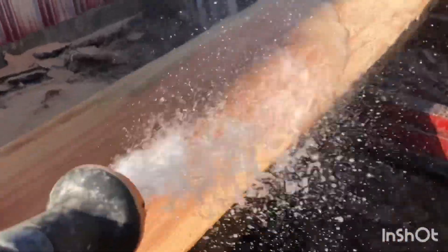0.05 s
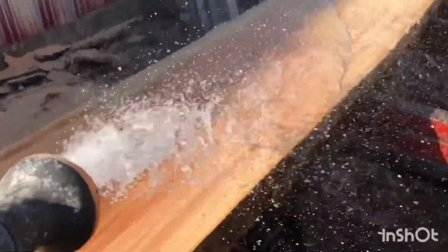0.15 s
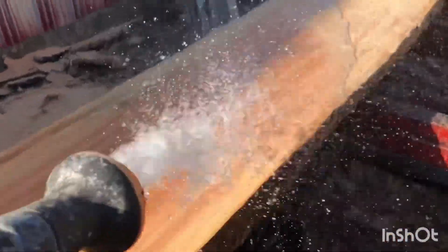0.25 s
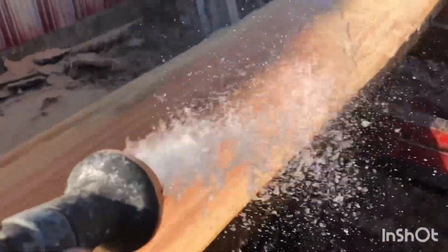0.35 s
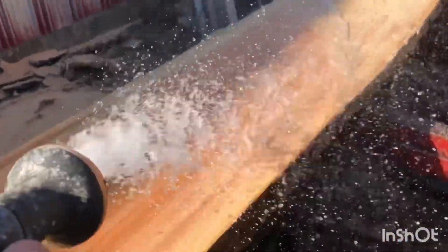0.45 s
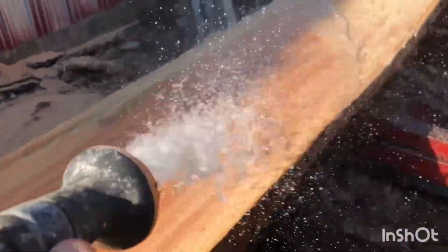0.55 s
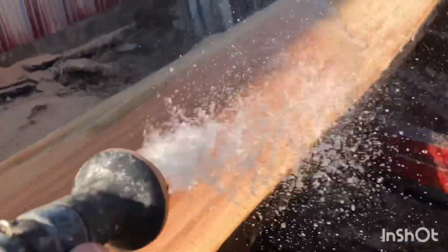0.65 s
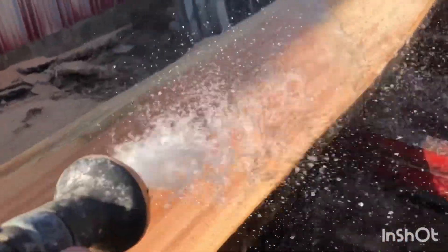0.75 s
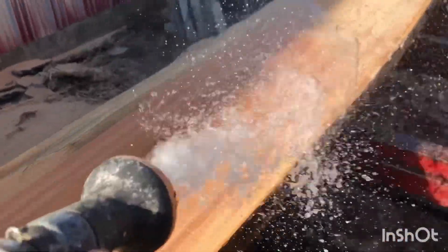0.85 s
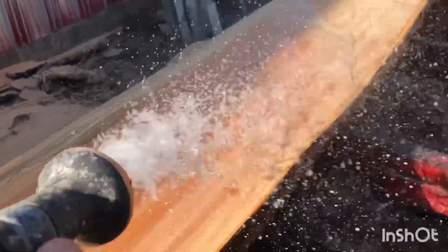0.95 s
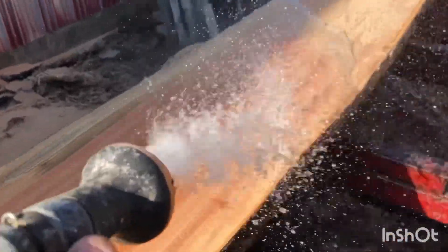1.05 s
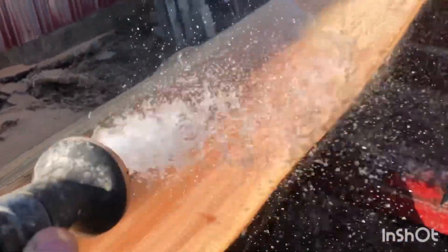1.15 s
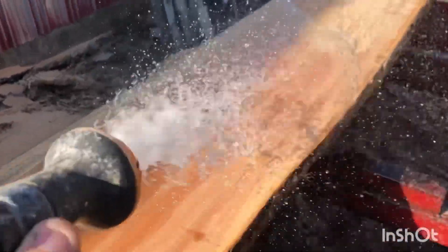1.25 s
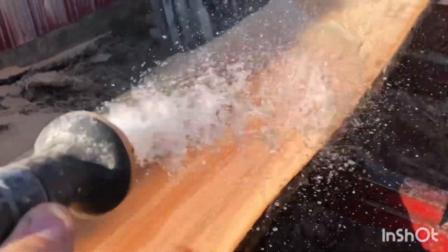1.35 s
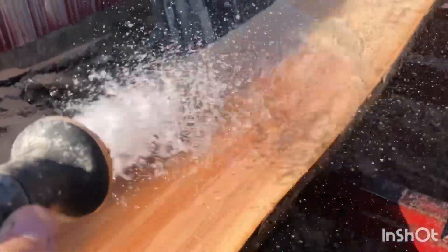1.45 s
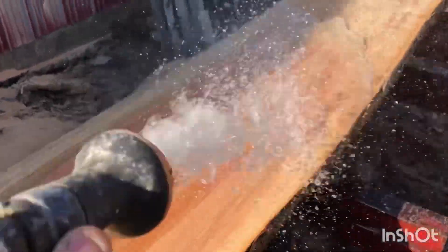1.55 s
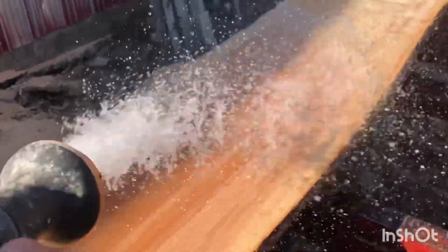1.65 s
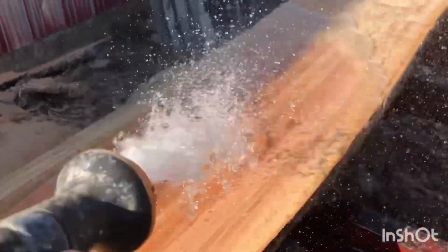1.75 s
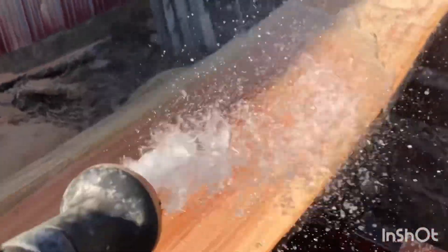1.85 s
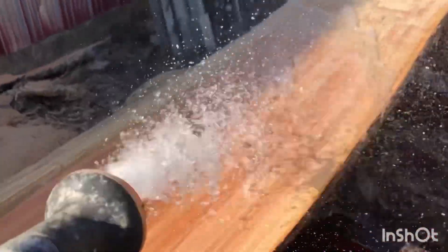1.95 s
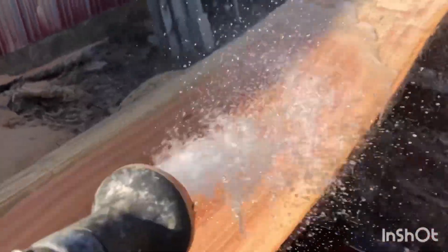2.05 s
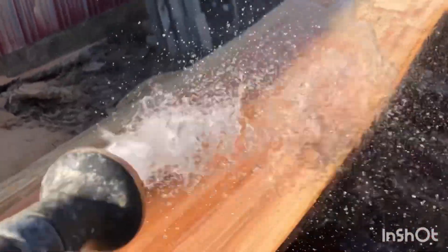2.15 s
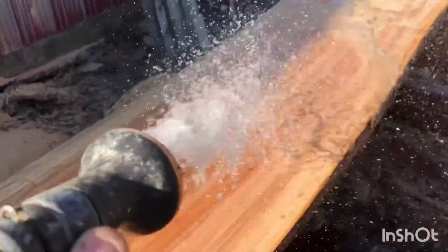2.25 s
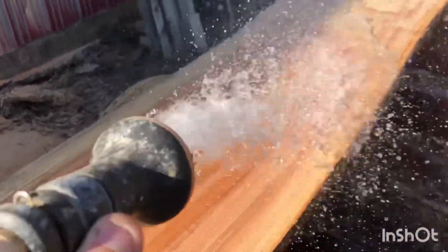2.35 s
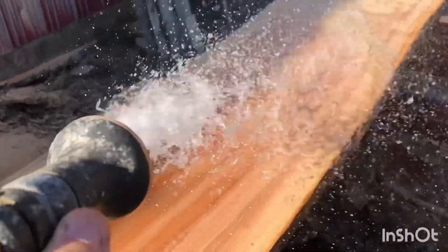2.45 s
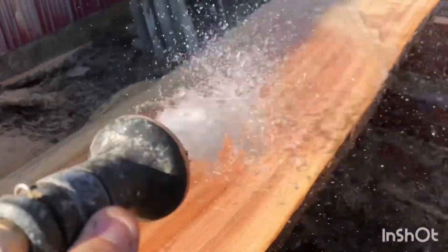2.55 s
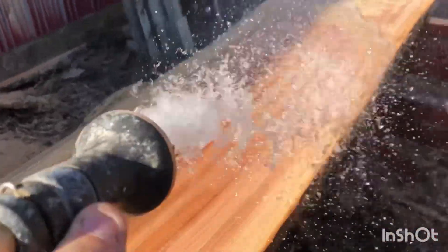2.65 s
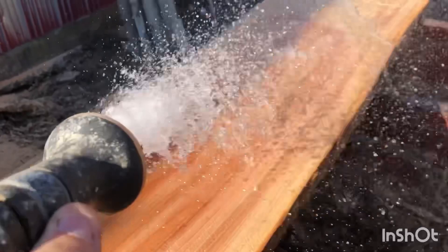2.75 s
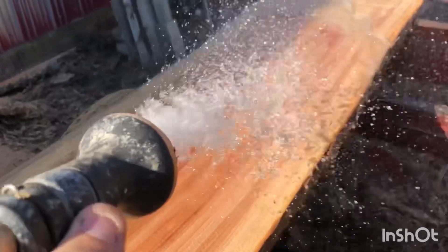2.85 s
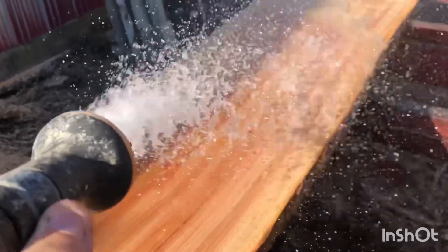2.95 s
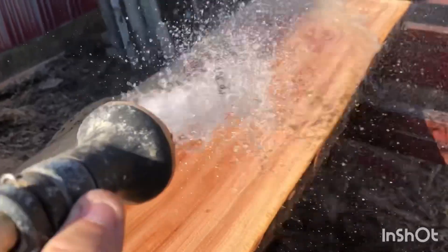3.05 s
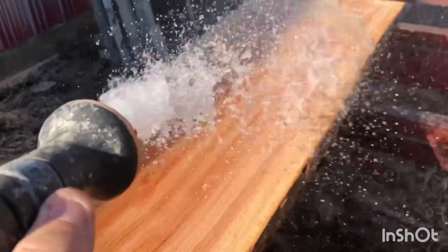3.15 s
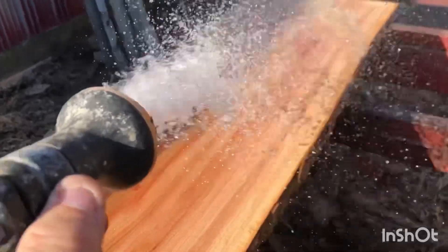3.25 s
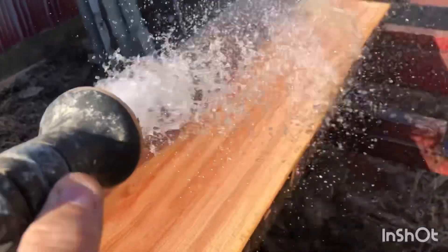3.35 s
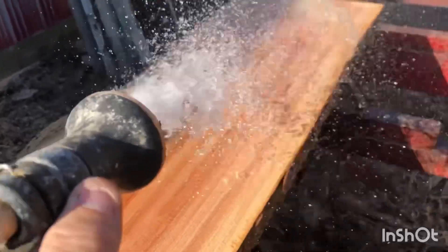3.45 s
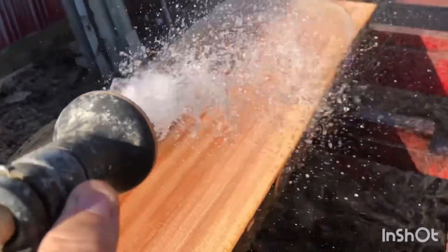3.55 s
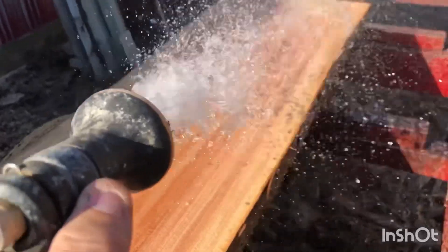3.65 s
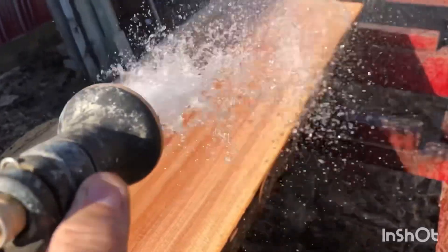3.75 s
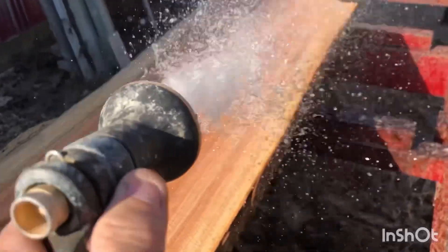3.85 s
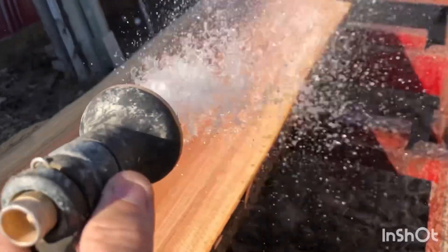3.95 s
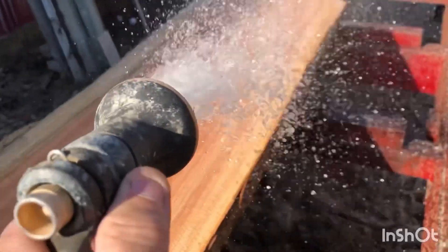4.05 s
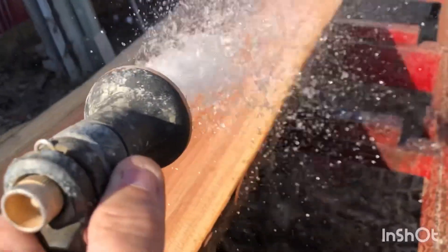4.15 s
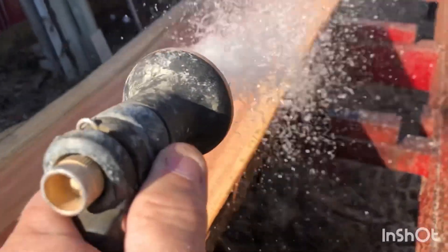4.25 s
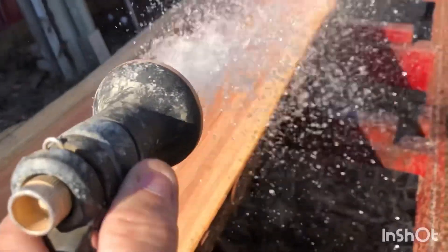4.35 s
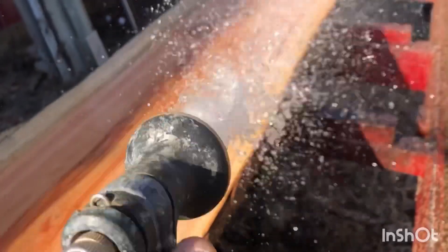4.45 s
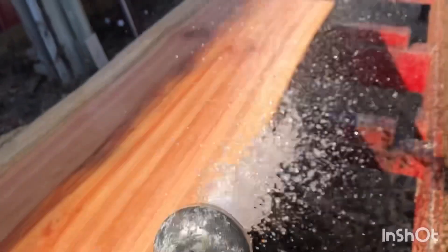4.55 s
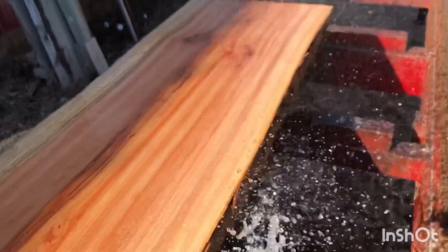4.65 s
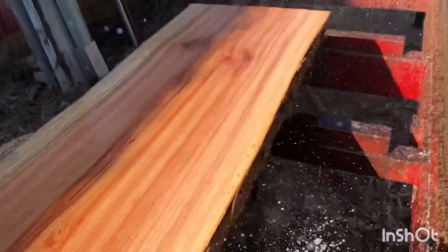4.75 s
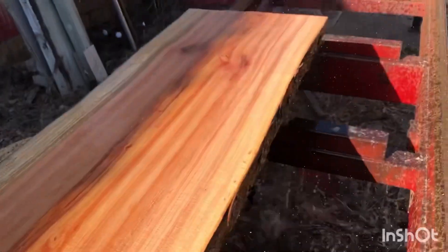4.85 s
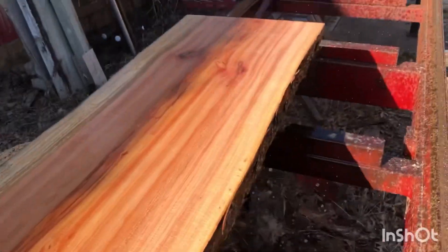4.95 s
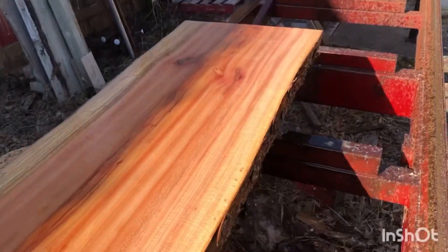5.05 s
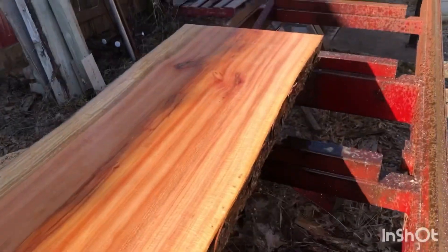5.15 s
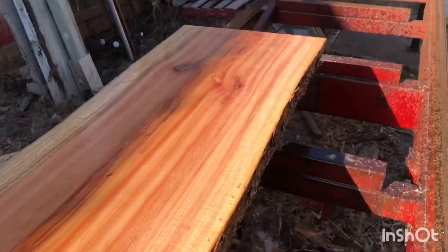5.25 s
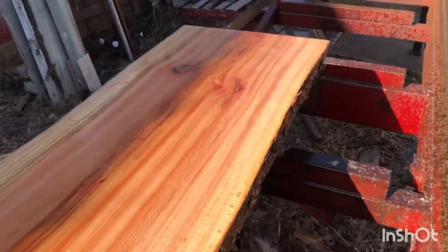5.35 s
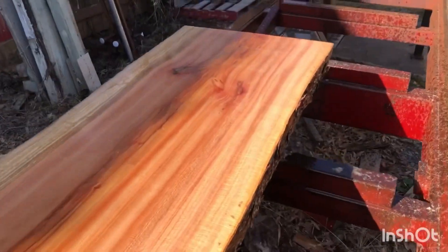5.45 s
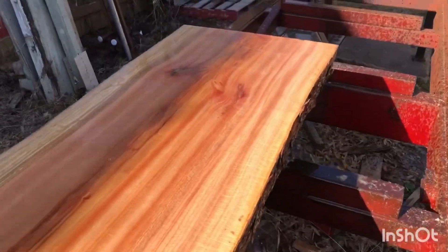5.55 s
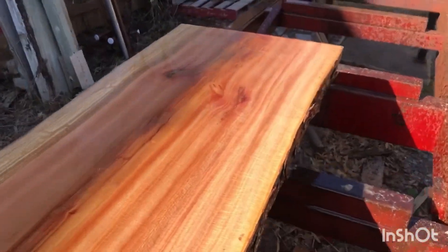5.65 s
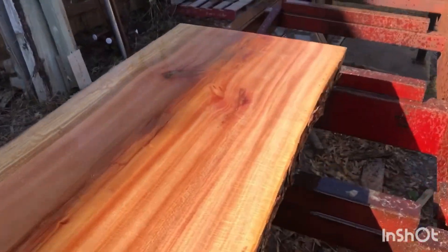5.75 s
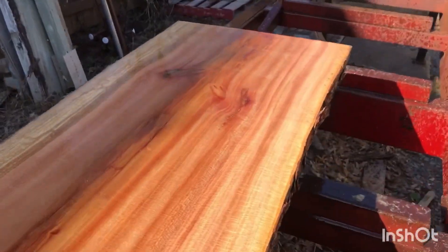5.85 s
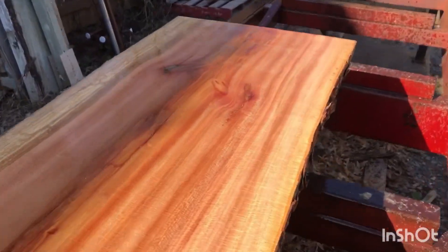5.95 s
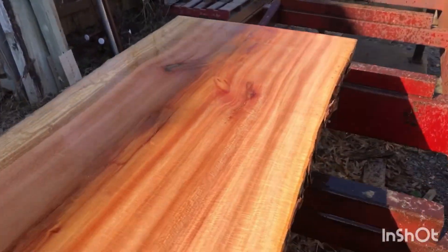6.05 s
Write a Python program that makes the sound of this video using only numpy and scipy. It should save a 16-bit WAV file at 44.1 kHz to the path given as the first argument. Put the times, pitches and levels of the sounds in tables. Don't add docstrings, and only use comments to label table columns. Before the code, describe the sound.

Strong, close water spray over wood with a few thumps, cut off in a glugging burst, then fine drips over distant machine rumble.

```python
import sys
import numpy as np
from scipy import signal
from scipy.fft import rfft, irfft, next_fast_len
from scipy.io import wavfile
from scipy.ndimage import uniform_filter1d, map_coordinates

SR = 44100
rng = np.random.default_rng(int(sys.argv[2]) if len(sys.argv) > 2 else 0)


def log_audio(samples):
    frames = np.atleast_2d(samples).T
    limited = np.clip(frames, -1, 1)
    pcm = np.round(limited * 32767).astype(np.int16)
    wavfile.write(sys.argv[1], SR, pcm)


def natural_amplitude(level_db):
    exponent = np.asarray(level_db, float) / 20
    return 10 ** exponent


N = 268569
TIME_S = np.arange(N) / SR
CLOSE_S = 4.79


def unit(x):
    return x / np.sqrt(np.mean(x ** 2) + 1e-20)


def curves(rows):
    s, *cols = np.transpose(rows)
    return [np.interp(TIME_S, s, c) for c in cols]


def ramp(from_s, to_s):
    return np.clip((TIME_S - from_s) / (to_s - from_s), 0, 1)


def wobble(rate):
    points = rng.standard_normal(int(N * 400 / SR) + 4)
    return map_coordinates(points, [TIME_S * min(rate, 399)])


def filtered(x, response):
    size = next_fast_len(N + 8192)
    spectrum = rfft(x, size) * response(np.fft.rfftfreq(size, 1 / SR))
    return irfft(spectrum, size)[:N]


def shape(points):
    f, db = np.transpose(points)
    return lambda hz: natural_amplitude(np.interp(np.log(hz + 1), np.log(f), db))


def modes(rows):
    def response(f):
        total = 0
        for centre, width, db, lag in rows:
            peak = 1j * f * width / (centre * centre - f * f + 1j * f * width)
            total = total + natural_amplitude(db) * np.exp(2j * np.pi * lag) * peak
        return total
    return response


def patchy(depth_db):
    z = signal.stft(rng.standard_normal(N), nperseg=256)[2]
    field = uniform_filter1d(rng.standard_normal(z.shape), size=10, axis=0)
    field = uniform_filter1d(field, size=4, axis=1)
    return signal.istft(z * natural_amplitude(depth_db * unit(field)), nperseg=256)[1][:N]


def droplets(count, centre_hz, spread, cycles, uneven_db, size=160):
    u, g = rng.random((count, 2)), rng.standard_normal(count)
    hz = np.clip(centre_hz * np.exp(spread * g), 200, 17000)[:, None]
    t = np.arange(size) / SR
    strength = natural_amplitude(-uneven_db * np.log(1 - 0.995 * u[:, 1:]))
    ring = np.sin(2 * np.pi * hz * t) * np.exp(-t * hz / cycles) * strength
    at = (u[:, :1] * N).astype(int) + np.arange(size)
    return unit(np.bincount(at.ravel(), ring.ravel(), N + size)[:N])


def add(track, s, piece):
    part = track[round(s * SR):][:len(piece)]
    part += piece[:len(part)]


def shut():
    return 1 - ramp(4.84, 4.9)


def jet(surge):
    # (time [s], level [dB])
    jet_level = [
        (0.0, -23),
        (4.4, -23),
        (4.54, -25.5),
        (4.63, -24),
        (4.73, -31.5),
        (4.79, -31.5),
        (4.8, -37),
        (4.9, -32),
    ]
    # (frequency [Hz], level [dB])
    hiss_colour = [(1300, -51), (2200, -19.5), (2900, -13), (4100, -4), (6000, -3.5), (9000, -9.5),
                   (12000, -5.5), (15000, -3), (15850, -7)]
    # (frequency [Hz], width [Hz], level [dB], lag [turns])
    nozzle = [(3776, 292, 3.7, -.2), (4512, 405, -8, -.13), (6255, 200, -15, 0), (8080, 1520, -1.2, .1),
              (9415, 484, 1.1, 0), (11150, 440, -9.6, -.15)]
    # (frequency [Hz], width [Hz], level [dB], lag [turns])
    whistles = [(11400, 2600, -4, 0), (10700, 860, -7, 0.03)]
    # (start [s], end [s])
    turns = [
        (4.38, 4.48),
        (4.45, 4.82),
    ]
    # (start [s], full [s], share [1])
    valve = [
        (4.49, 4.58, 0.95),
        (4.66, 4.717, 2.2),
    ]

    bursts = droplets(count=40000, centre_hz=9540, spread=0.53, cycles=1.0, uneven_db=1.5, size=40)
    mist = patchy(depth_db=1.32) + 0.47 * bursts
    open_air = filtered(mist, shape(hiss_colour))

    shares = [1 - ramp(*span) for span in turns]
    whistling = 1 - ramp(CLOSE_S, CLOSE_S + 0.038)
    shares += [share * ramp(start, full) * whistling for start, full, share in valve]
    colours = [nozzle[:1], nozzle[1:]] + [[row] for row in whistles]
    hiss = open_air
    for share, rows in zip(shares, colours):
        hiss = hiss + share * filtered(open_air, modes(rows))

    level_db = curves(jet_level)[0] + 0.28 * surge + 0.18 * wobble(60)
    return natural_amplitude(level_db) * unit(hiss) * shut()


def splash(surge):
    # (frequency [Hz], width [Hz], level [dB], lag [turns])
    slab = [(236, 220, -10.5, 0.0047), (550, 225, -3, .5), (1010, 270, 2.5, 1), (1596, 430, -4, 0.57)]
    # (time [s], extra fizz [dB])
    slugs = [(.28, 2), (1.16, 2), (1.25, 3), (1.34, 5), (1.56, 2), (2.2, 6), (2.34, 4), (2.47, 9),
             (2.9, 4.5), (3.262, 5.5), (3.31, 5.5), (4.1, 4.5), (4.19, 3), (4.36, 7), (4.59, 8),
             (4.655, 4.5), (4.7, 9), (4.75, 7.5), (4.8, 7.5)]
    # (time [s], level [dB])
    gurgle = [
        (4.36, -67),
        (4.41, -38),
        (4.46, -52),
        (4.57, -42.5),
        (4.65, -62),
        (4.72, -34.5),
        (4.75, -60),
        (4.85, -57),
        (5.15, -66.5),
    ]
    leave_s = 4.42
    slug_s = 0.014

    drying_db = -190 * np.maximum(TIME_S - CLOSE_S, 0)
    slugs_db = sum(db * np.exp(-((TIME_S - s) / slug_s) ** 2) for s, db in slugs)
    fizz_db = -39 - 1.5 * ramp(leave_s, leave_s + 0.044) + slugs_db + drying_db
    fizz_db = fizz_db + 0.28 * wobble(14) + 1.8 * surge + 1.1 * wobble(35)
    drum_db = -42 - 4.5 * ramp(leave_s, leave_s + 0.058) + drying_db
    drum_db = drum_db + 1.1 * wobble(25.13) + 0.7 * surge

    fizz = droplets(count=16000, centre_hz=2522, spread=0.17, cycles=3.2, uneven_db=3.0, size=240)
    blows = patchy(depth_db=-1.5) * natural_amplitude(0.36 * wobble(70))
    drum = unit(filtered(blows, modes(slab)))
    wet = (natural_amplitude(fizz_db) * fizz + natural_amplitude(drum_db) * drum) * shut()

    def echo(f):
        return 1 - 0.49 * 1j * f * 350 / (1880 ** 2 - f * f + 1j * f * 350)

    bubbles = droplets(count=9000, centre_hz=1604, spread=0.536, cycles=3.5, uneven_db=3.0, size=300)
    return filtered(wet, echo) + natural_amplitude(curves(gurgle)[0]) * bubbles


def yard():
    # (frequency [Hz], level [dB])
    rumble_colour = [(15, -40), (25, -3), (97, -1), (190, -5.5), (249, -7), (301, -13), (560, -16),
                     (775, -17), (1650, -22.5), (2550, -30.5), (5880, -39), (16000, -53)]
    # (frequency [Hz], width [Hz], level [dB])
    drone = [(76.8, 10, -56.5), (91.1, 7, -56), (119.6, 9, -57.5), (152, 8, -76), (244.5, 3, -62.5)]
    # (time [s], level [dB])
    idler = [
        (0.0, -53),
        (4.7, -59),
        (4.9, -64),
        (5.12, -50),
        (5.83, -48),
        (6.09, -59),
    ]

    rumble = natural_amplitude(-49.5) * unit(filtered(patchy(depth_db=1.05), shape(rumble_colour)))
    idler_db = curves(idler)[0] + 1.5 * wobble(2.93)
    tones = np.zeros(N)
    for hz, width, db in [*drone, (63.5, 18, idler_db)]:
        strength = natural_amplitude(db + 2.4 * wobble(width))
        tones += strength * np.sin(2 * np.pi * hz * TIME_S + 1.94 * wobble(width))
    return rumble + np.sqrt(2) * tones


def knocks():
    # (time [s], peak level [dB], frequency [Hz], time to fade by 60 dB [s])
    blobs = [
        (2.855, -26.5, 940, 0.026),
        (2.867, -31, 288, 0.028),
        (2.9, -34, 322, .03),
        (2.961, -35, 420, 0.035),
        (3.956, -26, 407, 0.015),
        (5.6642, -27.5, 885, 0.013),
    ]
    out, t = np.zeros(N), np.arange(SR // 10) / SR
    overtones = [(1.4, 0.45), (1.9, 0.45), (2.5, 0.55), (3.1, 0.12), (6, 0.04)]
    for s, db, hz, t60 in blobs:
        crack = sum(gain * np.sin(2 * np.pi * ratio * hz * t) for ratio, gain in overtones)
        crack = crack * natural_amplitude(-60 * t / (0.5 * t60)) * (1 - np.exp(-t / 0.00042))
        bent_t = t + 0.00029 * (1 - np.exp(-t / 0.00038))
        ring = np.sin(2 * np.pi * hz * bent_t) + 0.54 * np.sin(2 * np.pi * 0.6 * hz * t)
        ring = ring * (1 - np.exp(-t / 0.0015)) * natural_amplitude(2.5 - 60 * t / t60)
        add(out, s, natural_amplitude(db) * (crack + ring))
    return out


def glugs():
    # (centre time [s], peak level [dB], frequency [Hz], half length [s])
    pockets = [(4.407, -40, 495, 0.009), (4.56, -33, 1580, 0.006), (4.598, -35, 1030, .012),
               (4.637, -24.5, 2740, .004), (4.654, -33, 1740, .008), (4.714, -34, 580, .01),
               (4.718, -36, 760, 0.009), (4.736, -35, 1160, 0.01), (4.768, -25, 2400, 0.0032),
               (4.7864, -22, 1103, 0.013), (4.791, -23.5, 2690, 0.0081), (4.847, -32.5, 3320, 0.0074),
               (5.117, -44, 460, 0.013)]
    out = np.zeros(N)
    for s, db, hz, length in pockets:
        t = np.arange(-round(length * SR), round(length * SR)) / SR
        tone = np.sin(2 * np.pi * hz * (t + 0.14 * t * t / length))
        add(out, s - length, natural_amplitude(db) * np.exp(-6 * (t / length) ** 2) * tone)
    return out


def patter():
    # (time [s], level [dB])
    falling = [
        (4.82, -36),
        (4.88, -46.5),
        (4.98, -37),
        (5.015, -49),
        (5.04, -41),
        (5.07, -51),
        (5.1, -42.5),
        (5.13, -57.5),
        (5.45, -62.5),
    ]
    # (time [s], peak level [dB], frequency [Hz])
    spatter = [(4.632, -7, 5860), (4.6467, -9, 9000), (4.7057, -10, 11110), (4.8181, -12, 7320),
               (4.843, -16, 6900), (4.8472, -21, 3400), (4.8801, -25, 8270), (4.898, -23, 8100),
               (4.9049, -25, 12660), (4.9305, -23, 14300), (4.9555, -16, 5860), (4.9655, -28, 3600),
               (4.9771, -26, 11700), (4.9823, -25, 5300), (4.9858, -25, 14000), (4.9995, -24, 6720),
               (5.0293, -20, 6500), (5.0393, -27, 8500), (5.046, -24, 4200), (5.0522, -22, 3880),
               (5.0824, -25, 6890), (5.097, -21, 4470), (5.117, -33, 9300)]
    # (time [s], peak level [dB], frequency [Hz])
    drips = [(5.1599, -40, 6980), (5.2299, -40, 13780), (5.2573, -30.5, 3830), (5.2787, -45, 10420),
             (5.3044, -40, 8350), (5.3171, -32, 4820), (5.3287, -41, 13180), (5.3384, -41, 5600),
             (5.3463, -26, 12000), (5.3584, -41, 9650), (5.372, -28, 6600), (5.401, -33, 3720),
             (5.406, -41, 9300), (5.4478, -46, 8870), (5.4654, -42, 6000), (5.5236, -39, 6950),
             (5.5673, -41, 4050), (5.6139, -32.5, 6540), (5.6636, -42, 5170), (5.6907, -47, 5000),
             (5.7353, -45, 14000), (5.7485, -45, 12580), (5.7714, -33.5, 5840), (5.7806, -38, 6120),
             (5.7837, -44, 4200), (5.9085, -40, 5940), (5.9426, -49, 6120), (5.9811, -44, 6030),
             (6.0127, -52, 3880), (6.0642, -47, 3620)]
    # (fine spatter [dB], fat drips [dB])
    ring_levels = (-6, -2)
    # (frequency [Hz], width [Hz], level [dB], lag [turns])
    port = [(15500, 1400, -3, 0)]

    thinning_db = 10 * np.maximum(TIME_S - falling[-1][0], 0)
    level_db = curves(falling)[0] - thinning_db + 2.1 * wobble(90)
    rain = droplets(count=40000, centre_hz=12200, spread=0.6, cycles=2.5, uneven_db=3, size=60)
    strays = droplets(count=900, centre_hz=9500, spread=0.36, cycles=1.6, uneven_db=3.0, size=60)
    mist = ramp(4.82, 4.88) * natural_amplitude(level_db) * (rain + natural_amplitude(-10) * strays)

    ticks, t = np.zeros(N), np.arange(SR // 30) / SR
    for s, db, hz in [*spatter, *drips]:
        ring_db = ring_levels[int(s > drips[0][0] - 0.01)]
        snap, spray, haze = rng.standard_normal((3, len(t)))
        tone = np.sin(2 * np.pi * hz * t)
        strike = np.sin(2 * np.pi * 11000 * t) * natural_amplitude(-60 * t / 0.0005)
        ring_s = 0.0035 + 12 / hz
        ring = (0.75 * tone + 0.8 * snap) * natural_amplitude(ring_db - 60 * t / ring_s)
        splinters = 2 * uniform_filter1d(spray, size=5) * tone + 1.1 * haze
        cloud = natural_amplitude(-19 - 60 * t / 0.028) * splinters
        drip = 2 * strike + (ring + cloud) * (1 - np.exp(-t / 0.0001))
        add(ticks, s, natural_amplitude(db + 1.5) * drip / np.abs(drip).max())
    ticks = filtered(ticks, lambda f: (1j * f / (1800 + 1j * f)) ** 2)
    return filtered(mist + ticks, lambda f: 1 + modes(port)(f))


def scene():
    surge = 0.35 * wobble(11) + 0.6 * wobble(28)
    mix = jet(surge) + splash(surge) + yard() + knocks() + glugs() + patter()
    return np.tile(mix, (2, 1))


def top_cut(x):
    return signal.sosfilt(signal.butter(12, 17080, fs=SR, output="sos"), x)


def record(dry):
    # (time [s], low edge [Hz], high edge [Hz], level [dB])
    slips = [
        (0.212, 4700, 5900, -41),
        (2.345, 8200, 9800, -35),
        (3.415, 5540, 7700, -37),
    ]
    side = np.zeros(N)
    for s, low_hz, high_hz, db in slips:
        swell = np.cos(np.pi / 2 * np.clip((TIME_S - s) / 0.028, -1, 1)) ** 2
        band = filtered(rng.standard_normal(N), lambda f: (f > low_hz) & (f < high_hz))
        side += natural_amplitude(db) * swell * unit(band)

    def microphone(hz):
        return np.clip((15810 - hz) / 70, 0, 1) ** 2 * (1j * hz / (26 + 1j * hz)) ** 6

    mid = filtered(dry[0], microphone)
    return top_cut(np.array([mid + side, mid - side]))


dry = scene()
out = record(dry)
log_audio(out)
```